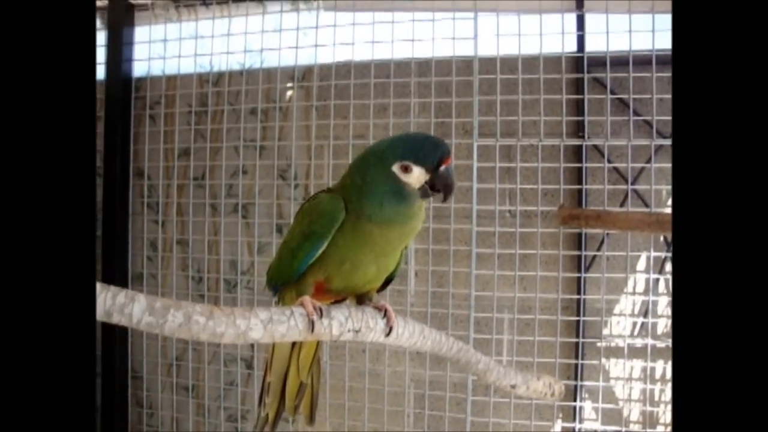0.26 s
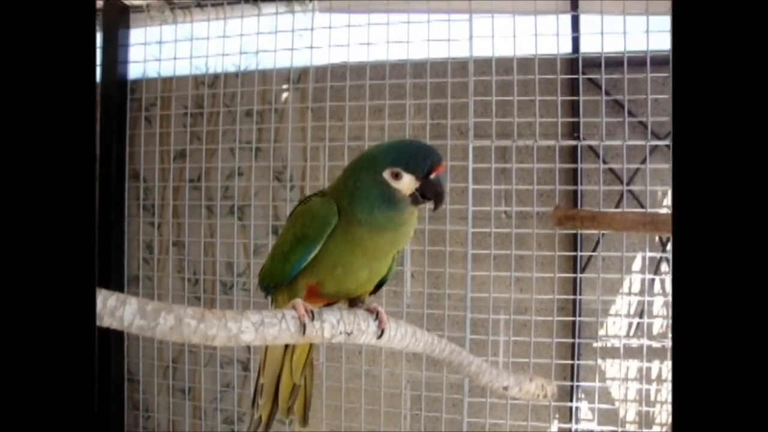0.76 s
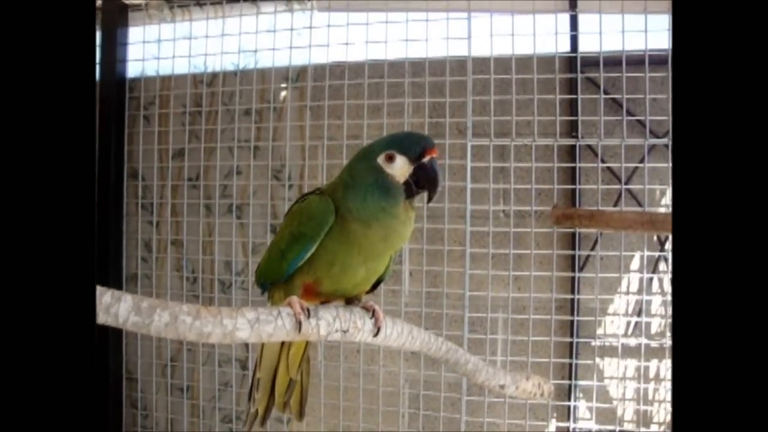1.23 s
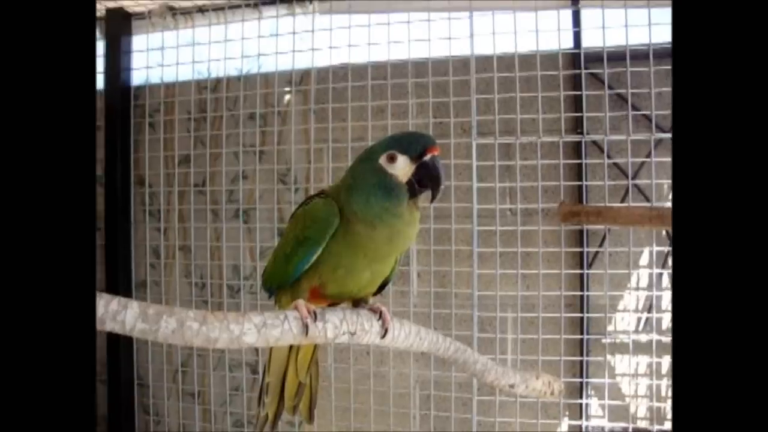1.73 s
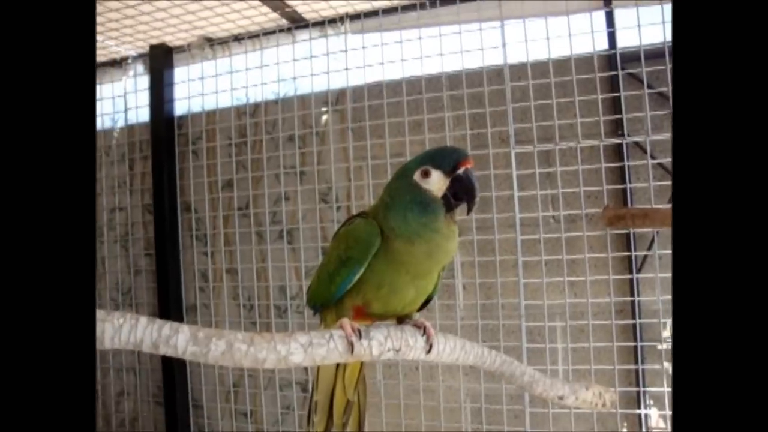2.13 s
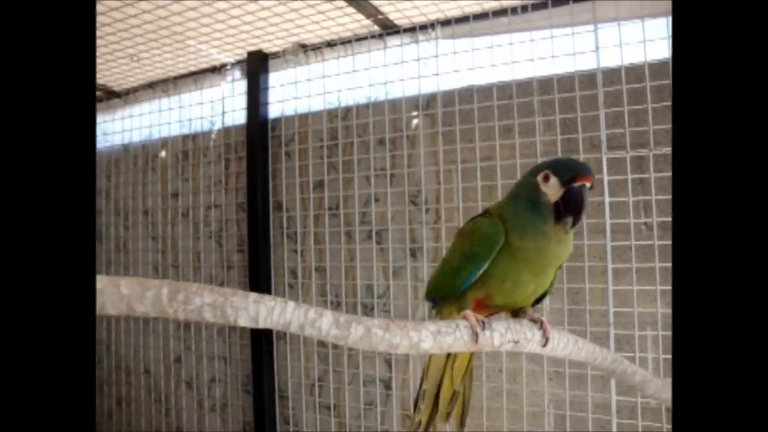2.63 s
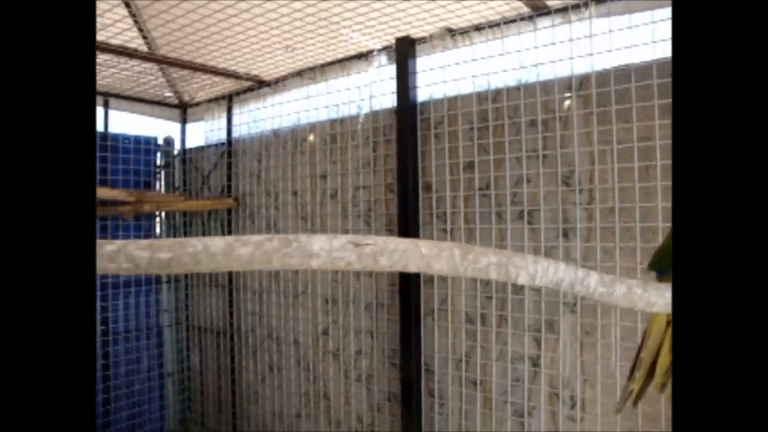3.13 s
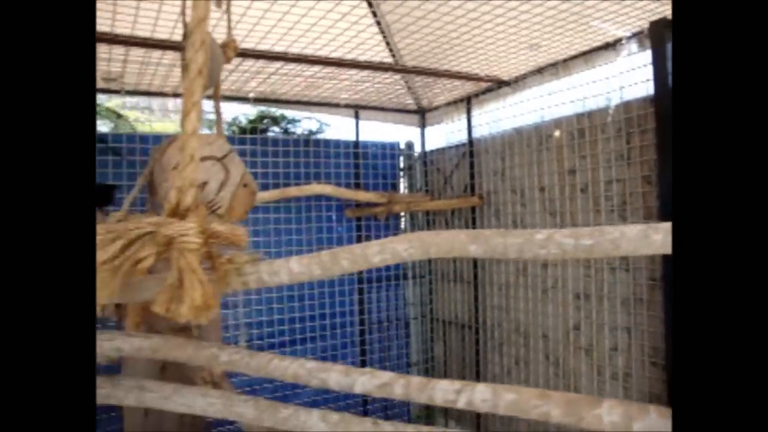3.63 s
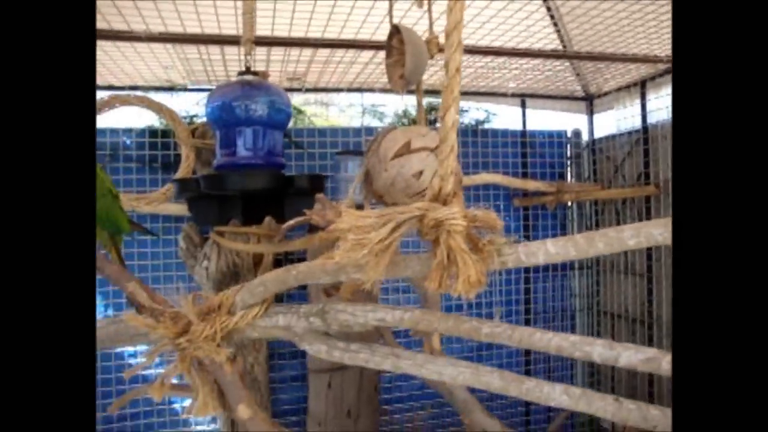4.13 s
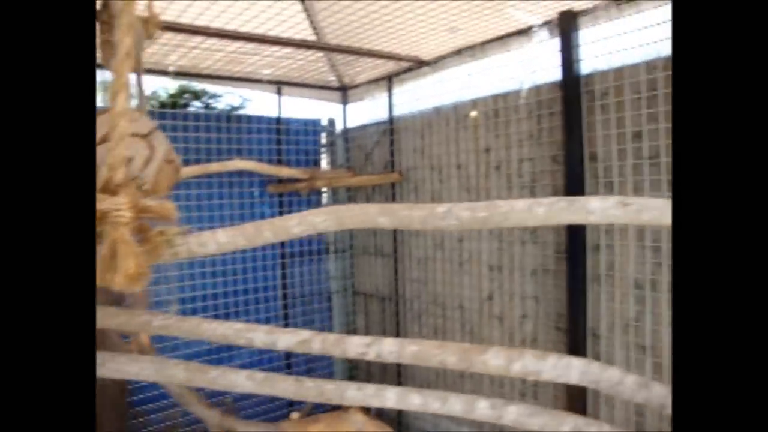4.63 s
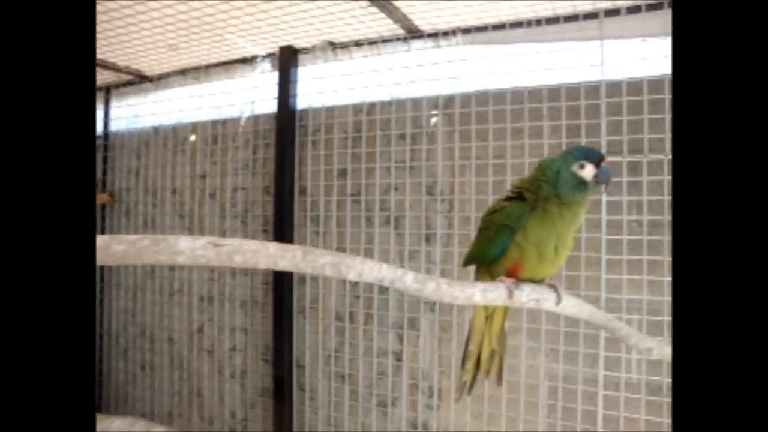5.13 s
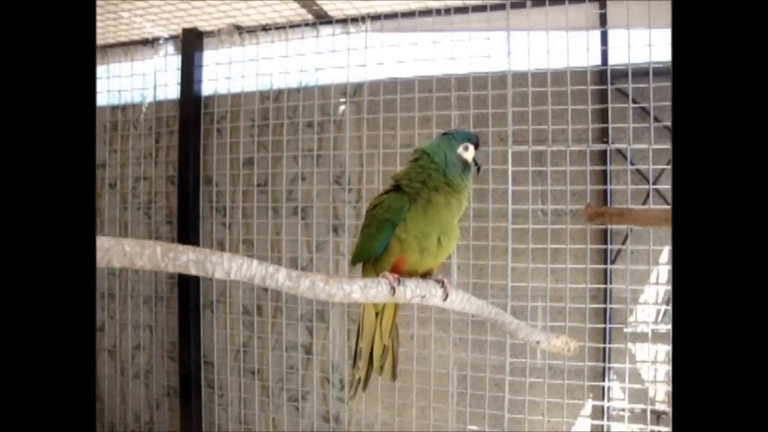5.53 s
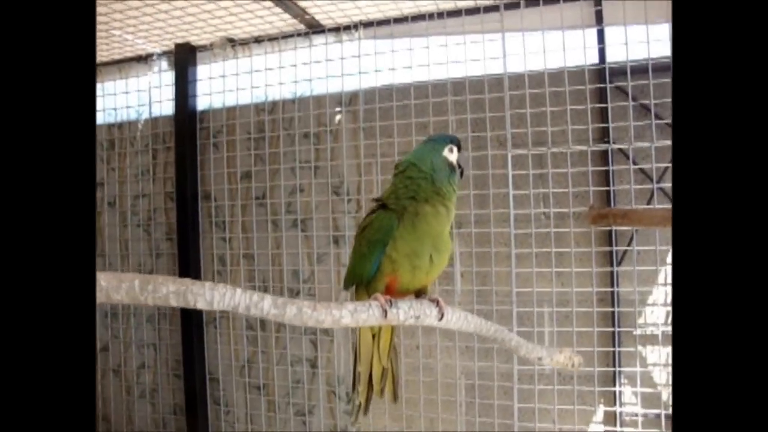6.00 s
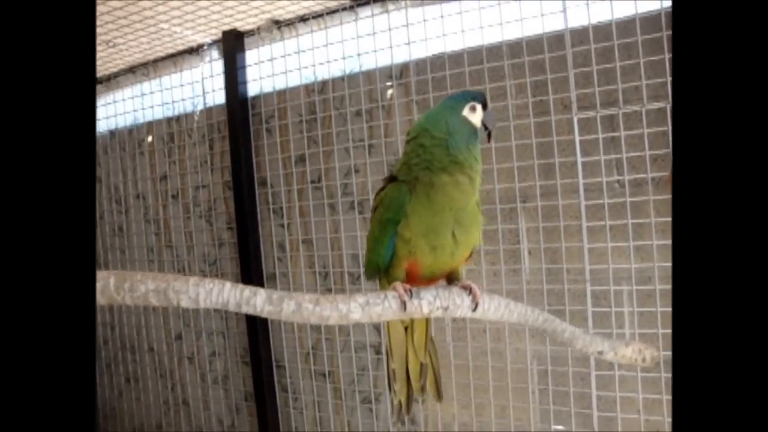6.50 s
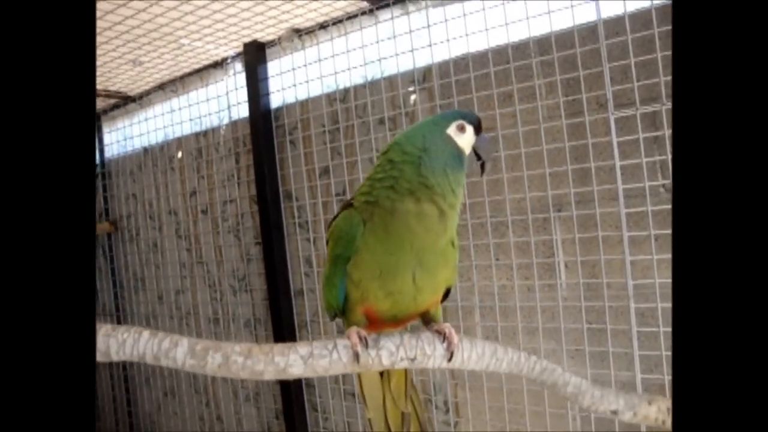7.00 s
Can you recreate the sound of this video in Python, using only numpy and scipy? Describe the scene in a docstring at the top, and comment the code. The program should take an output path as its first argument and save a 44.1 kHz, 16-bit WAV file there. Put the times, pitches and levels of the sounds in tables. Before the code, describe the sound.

In an outdoor aviary, a macaw close to the microphone briefly shakes its feathers and lets out a loud, harsh screech. About two seconds later it gives a lower squawk, a bark running into a rasp. Both calls echo briefly and slightly overload the microphone. Near the end come a few small clicks of beak or claw. Faint distant birds and a steady hiss continue throughout.

```python
"""Over a steady outdoor murmur and hiss, distant birds call and whistle from first to last.
Near 2 s a macaw in a wire aviary shakes its feathers and screeches; near 4 s comes a lower squawk,
a bark running into a rasp. Each syllable is a rough, arching pulse train from the syrinx, filtered by
throat and beak and reflected by walls and roof. The loud calls overload the microphone and make the
recorder turn down its bass for a moment. Near 7 s a beak or claw makes three small clicks."""
import sys
import numpy as np
from scipy import signal
from scipy.fft import rfft, irfft, next_fast_len
from scipy.io import wavfile
from scipy.ndimage import uniform_filter1d, map_coordinates

SR = 44100
rng = np.random.default_rng(int(sys.argv[2]) if len(sys.argv) > 2 else 0)


def output_pcm(signal):
    """Save a mono or channel-first signal as 16-bit PCM at the path in sys.argv[1].

    Samples are clipped to [-1, 1] before scaling.
    """
    pcm = np.clip(np.atleast_2d(signal).T, -1, 1) * 32767
    wavfile.write(sys.argv[1], SR, np.round(pcm).astype(np.int16))


N = 319989
T = np.arange(N) / SR
TOP_HZ = 10080  # band limit

# spectra of the outdoor background: (frequency [Hz], relative level [dB])
RUMBLE_SPECTRUM = [(20, -29.5), (50, -18), (100, -6.5), (140, 0), (200, -3.5), (330, -3), (480, -5.5),
                   (900, -57)]
MURMUR_SPECTRUM = [(200, -15.5), (400, -4.5), (600, -0.5), (850, -0.5), (1200, -6), (1700, -14.5),
                   (2500, -20.5), (5000, -47.5)]
HISS_SPECTRUM = [(500, -27), (1500, -3.5), (3000, 1), (4500, 0), (7000, -1.5), (10000, -4)]
# distant harsh calls: (time [s], source level [dB], centre frequency [Hz], fall [octaves/s])
FAR_CALLS = [(0.119, -49.5, 3420, 1.8), (0.245, -60, 3200, 0.37), (.89, -58.5, 3270, .8),
             (1.582, -53.5, 3250, 0.47), (2.779, -55, 3390, .3), (3.498, -59, 3170, 0.48),
             (4.444, -57, 3150, .7), (6.579, -52.5, 3440, 0.51)]
# distant whistles: (time [s], source level [dB], half width [s], pitch [Hz])
FAR_WHISTLES = [(.916, -63.5, 0.061, 2740), (1.799, -62, 0.1096, 3085), (4.52, -63.5, 0.1, 3070),
                (5.876, -52.5, 0.057, 1405), (6.57, -58, .03, 3910)]
# reverberation of the yard and of the aviary walls: (frequency [Hz], time to fall 60 dB [s])
YARD_DECAY = [(300, 0.35), (1000, 0.39), (2450, 0.48), (4200, 0.47), (9000, 0.28)]
WALL_DECAY = [(300, 0.057), (2000, 0.14), (9000, 0.18)]
# spectrum of rubbing feathers: (frequency [Hz], relative level [dB])
FEATHER_SPECTRUM = [(120, -48), (200, -35), (321, 6.5), (532, -18), (627, 8), (714, 0), (1870, 1.5),
                    (9880, -6), (12800, -51)]
# pitch arch of each syllable, from start to end: (time [s], pitch [Hz])
SCREECH_PITCH = [(2.151, 539.5), (2.2, 528.4), (2.248, 790.7), (2.279, 917.7), (2.338, 925.7),
                 (2.368, 1189), (2.398, 807), (2.416, 658), (2.445, 536)]
BARK_PITCH = [(3.822, 595.8), (3.841, 609.2), (3.853, 912), (3.870, 939.3), (3.886, 643.2), (3.905, 686),
              (3.918, 649), (3.942, 434)]
RASP_PITCH = [(3.940, 434), (3.982, 584.3), (4.004, 625.3), (4.038, 761), (4.078, 610.7), (4.098, 451),
              (4.126, 286)]
# screech, bark, rasp: (source level [dB], attack [s], release [s], open-beak treble [dB],
# beak opening [s], beak closing [s], clearest moment [s], its half width [s], its roughness [0-1])
GESTURES = [(-11.5, 0.062, 0.033, -1.5, 0.17, 0.049, 2.33, 0.0339, 0.18),
            (-11, 0.083, 0.041, 3, 0.084, .003, 3.83, 0.024, 0.27),
            (-21, 0.022, 0.048, 2, .003, 0.083, 4.03, .022, 0.36)]
# response of throat and open beak: (frequency [Hz], relative gain [dB])
SCREECH_THROAT = [(300, -50), (520, -20.5), (800, -14), (1150, -12), (1400, -16), (1850, -3.5), (2100, -1),
                  (2400, 2.5), (2800, -6.5), (3900, -14), (4600, -15.5), (5800, -23), (7250, -18),
                  (8400, -36.5), (10000, -40)]
BARK_THROAT = [(250, -47.5), (450, -10.5), (640, -8), (800, -13.5), (940, -4), (1120, -10), (1400, -0.5),
               (1650, -7.5), (2000, 0), (2350, -11.5), (2750, -3.5), (3400, -20), (3950, -15), (4170, -8),
               (4450, -16), (4800, -15), (5600, -22), (8500, -31), (10000, -40)]
RASP_THROAT = [(200, -34), (320, -12.5), (450, -16), (620, -6), (760, -10.5), (900, -2.5), (1150, -4),
               (1430, 0.5), (1620, -3.5), (1850, -5.5), (2500, -12.5), (3000, -23.5), (3950, -18),
               (4200, -9), (4450, -23.5), (4750, -14.5), (5600, -28), (7000, -32.5), (10000, -41)]
# bright and broad parts of the air noise in the syrinx: (frequency [Hz], gain [dB])
FIZZ_SPECTRUM = [(1500, -20.5), (3000, 1.0), (4500, 2), (7000, 5)]
BREATH_SPECTRUM = [(400, -11), (1200, 1.5)]
# the syrinx catches as a call starts and between pushes: (time [s], depth [dB], half width [s])
CATCHES = [(2.168, 19, 0.0026), (2.186, 11, 0.0028), (2.208, 12, 0.0063), (2.232, 3.5, .009),
           (2.285, 5, 0.011), (2.369, 3, 0.0088), (3.844, 7.5, 0.0064), (3.887, 7, 0.0057)]
# clicks of beak or claw: (time [s], crack level [dB], ring level [dB])
CLICKS = [(6.708, -43, -27), (7.094, -44.5, -60), (7.122, -46, -60)]
# modes of a click's ring: (frequency [Hz], relative level [dB], time to fall 60 dB [s])
CLICK_MODES = [(1920, 2.5, 0.018), (2030, -17, 0.018)]
# spectrum of a click's crack: (frequency [Hz], relative level [dB])
CRACK_SPECTRUM = [(600, -19), (1500, 2.5), (3000, 3), (4700, -5), (9000, -17)]


def amp(db):
    """Amplitude ratio: tenfold for every 20 dB."""
    return 10 ** (np.asarray(db) / 20)


def unit_rms(x):
    """Normalisation to unit mean power."""
    return x / np.sqrt(np.mean(x ** 2) + 1e-20)


def along(points, hz):
    """Interpolation of (frequency, value) points on a logarithmic frequency axis."""
    frequencies, values = np.transpose(points)
    return np.interp(np.log(hz + 1), np.log(frequencies + 1), values)


def wobble(rate, t):
    """Low-pass random modulation: a spline through `rate` Gaussian knots a second."""
    knots = rng.standard_normal(2 ** 13)
    return map_coordinates(knots, [(t - t[0]) * rate], mode="wrap")


def filtered(x, response):
    """Linear filtering: the spectrum is multiplied by a frequency response."""
    size = next_fast_len(len(x) + 2 ** 13)
    return irfft(rfft(x, size) * response(np.fft.rfftfreq(size, 1 / SR)), size)[:len(x)]


def coloured(x, spectrum):
    """Zero-phase spectral shaping by (frequency [Hz], gain [dB]) points."""
    return filtered(x, lambda hz: amp(along(spectrum, hz)))


def noise(spectrum):
    """Spectrally shaped Gaussian noise of unit power."""
    return unit_rms(coloured(rng.standard_normal(N), spectrum))


def swell(centre, half_width, t=T):
    """Gaussian envelope whose standard deviation is half_width."""
    return np.exp(-.5 * np.minimum(((t - centre) / half_width) ** 2, 100))


def ramps(t, first_s, last_s):
    """Linear edge ramps: 1 at both ends of t, 0 in the hold between."""
    return np.clip(np.maximum(1 - (t - t[0]) / first_s, 1 - (t[-1] - t) / last_s), 0, 1)


def outdoors():
    """Incoherent addition: a drifting far rumble and murmur under an even hiss."""
    rumble = amp(-57.5 + 1.3 * wobble(6.5, T)) * noise(RUMBLE_SPECTRUM)
    murmur = amp(-50 + 0.4 * wobble(9, T)) * noise(MURMUR_SPECTRUM)
    return rumble + murmur + amp(-56.5) * noise(HISS_SPECTRUM)


def far_calls():
    """Narrow-band noise: each distant harsh call is blurred to one falling resonance."""
    out = np.zeros(N)
    for time, db, centre_hz, fall in FAR_CALLS:
        inside = np.abs(T - time) < .3
        t = T[inside]
        phase = 2 * np.pi * np.cumsum(centre_hz * 2 ** (-fall * (t - time))) / SR
        band = wobble(1100, t) * np.cos(phase) + wobble(1100, t) * np.sin(phase)
        out[inside] += amp(db) * swell(time, half_width=0.046, t=t) * band
    return out


def reverberation(x, decay, delay_s):
    """Diffuse reflection: convolution with noise that decays exponentially, each band at its own rate."""
    hz, t, bands = signal.stft(rng.standard_normal(SR * 3 // 4), SR, nperseg=256)
    tail = signal.istft(bands * amp(-60 * t / along(decay, hz)[:, None]), SR, nperseg=256)[1]
    tail = filtered(tail, lambda f: f < TOP_HZ)
    tail *= np.sqrt(2 * TOP_HZ / SR) / np.linalg.norm(tail)  # unit mean power gain in the band
    return signal.fftconvolve(x, np.pad(tail, (int(delay_s * SR), 0)))[:N]


def far_whistles():
    """Frequency modulation: distant birds whistle pure tones that waver slightly."""
    waver = 1 + 0.0064 * wobble(90, T)
    phase_per_hz = 2 * np.pi * np.cumsum(waver) / SR
    return sum(amp(db) * swell(time, half_width) * np.sqrt(2) * np.sin(hz * phase_per_hz)
               for time, db, half_width, hz in FAR_WHISTLES)


def feathers(start_s=1.895, length_s=0.24, fade_s=0.061, beat_hz=22.2, swing_db=4.5):
    """Amplitude-modulated friction noise: each beat of the shaken plumage is a puff of tiny scrapes."""
    inside = (T > start_s) & (T < start_s + length_s)
    t = T[inside]
    beats_db = swing_db * np.sin(2 * np.pi * beat_hz * (t - t[0]))
    envelope = np.zeros(N)
    envelope[inside] = amp(-43.5 + beats_db - 12.7 * ramps(t, fade_s, fade_s))
    return envelope * noise(FEATHER_SPECTRUM) * amp(2.8 * wobble(600, T))


def articulation(t, gesture, harshness=0.726, edge_db=25, beak_shut_db=12.5):
    """Vocal modulation: the level rises and falls, roughness clears once, the beak opens and closes."""
    peak_db, attack, release, open_db, opening, closing, clear_s, clear_width, clear_rough = gesture
    level_db = peak_db - edge_db * ramps(t, attack, release) ** 1.2
    roughness = harshness + (clear_rough - harshness) * swell(clear_s, clear_width, t)
    treble_db = open_db - beak_shut_db * ramps(t, opening, closing)
    return level_db, roughness, treble_db


def resonate(x, spectrum, size=2048):
    """Cavity resonance: a minimum-phase filter with this spectrum rings after each pulse."""
    gain = amp(along(spectrum, np.fft.rfftfreq(size, 1 / SR)))
    cepstrum = irfft(np.log(gain))
    cepstrum[1:size // 2] *= 2  # folding onto positive time makes the response causal
    cepstrum[size // 2 + 1:] = 0
    impulse_response = irfft(np.exp(rfft(cepstrum)))
    return signal.fftconvolve(x, impulse_response)[:len(x)]


def syllable(arch, gesture, throat, beak_hz, jitter, smear_rad, breath_db, fizz_db, flutter_db,
             fundamental_db, octave_db, doubling=0.42):
    """Source-filter principle: uneven syrinx pulses and air noise excite the throat and beak."""
    inside = (T > arch[0][0]) & (T < arch[-1][0])
    t = T[inside]
    pitch = np.interp(t, *np.transpose(arch))
    level_db, roughness, treble_db = articulation(t, gesture)
    # the membranes change their period every few cycles, which smears the overtones most
    pitch *= 1 + jitter * roughness * wobble(300, t)
    phase = 2 * np.pi * np.cumsum(pitch) / SR + smear_rad * roughness * wobble(600, t)
    harmonic = np.arange(1, 15)[:, None]
    boost_db = fundamental_db * (harmonic == 1) + octave_db * (harmonic == 2)
    strength = amp(boost_db) / np.sqrt(1 + (harmonic / 6) ** 4)
    alternation = 1 + doubling * roughness * np.cos(phase / 2)  # strong and weak cycles take turns
    pulses = unit_rms(alternation * np.sum(strength * np.cos(harmonic * phase), axis=0))
    # air bursts through once a cycle and takes over from the high overtones
    air = unit_rms(rng.standard_normal(N)[inside] * (1 + np.cos(phase)))
    fizz = amp(fizz_db) * coloured(air, FIZZ_SPECTRUM)
    breath = amp(breath_db) * roughness * coloured(air, BREATH_SPECTRUM)
    flutter = amp(flutter_db * roughness * wobble(450, t))
    voice = resonate((pulses + breath + fizz) * flutter, throat)
    # a wider beak lets out more of the treble, which also flickers
    treble = filtered(voice, lambda hz: 1 - 1 / (1 + (hz / beak_hz) ** 6))
    voice += (amp(treble_db + 4.9 * wobble(107, t)) - 1) * treble
    voice /= np.sqrt(np.abs(uniform_filter1d(voice ** 2, size=300)) + 1e-12)  # unit running rms
    out = np.zeros(N)
    out[inside] = voice * amp(level_db) * (1 - ramps(t, .002, .002))
    return out


def macaw():
    """Interrupted phonation: a stuttering start into the screech, later a bark that runs into a rasp."""
    screech = syllable(SCREECH_PITCH, GESTURES[0], SCREECH_THROAT, beak_hz=3680,
                       jitter=0.0594, smear_rad=0.4, breath_db=0, fizz_db=-3,
                       flutter_db=2.5, fundamental_db=2.5, octave_db=1.5)
    bark = syllable(BARK_PITCH, GESTURES[1], BARK_THROAT, beak_hz=2390,
                    jitter=0.058, smear_rad=0.36, breath_db=-2, fizz_db=-0.5,
                    flutter_db=4.0, fundamental_db=5.5, octave_db=1.0)
    rasp = syllable(RASP_PITCH, GESTURES[2], RASP_THROAT, beak_hz=3000,
                    jitter=0.0664, smear_rad=0.42, breath_db=-0.5, fizz_db=-0.5,
                    flutter_db=3.5, fundamental_db=2.5, octave_db=0)
    catches_db = sum(depth_db * swell(time, half_width) for time, depth_db, half_width in CATCHES)
    return (screech + bark + rasp) * amp(-catches_db)


def bass_cut(x, threshold_db=-21.5, corner_hz=670, recovery_db_per_s=5.5):
    """Automatic gain control: a loud sound turns the recorder's bass down at once, and it creeps back."""
    level_db = 10 * np.log10(np.abs(uniform_filter1d(x ** 2, size=2200)) + 1e-12)
    excess_db = np.maximum(level_db - threshold_db, 0)
    recovery_db = recovery_db_per_s * T
    cut_db = np.maximum.accumulate(excess_db + recovery_db) - recovery_db
    bass = filtered(x, lambda hz: 1 / (1 + (hz / corner_hz) ** 2))
    return x + (amp(-cut_db) - 1) * bass


def overload(x, positive_limit=0.52, negative_limit=0.74):
    """Asymmetric saturation: the microphone rounds off peaks, one side sooner, making soft thumps."""
    headroom = np.where(x > 0, positive_limit, negative_limit)
    return x / (1 + np.abs(x / headroom) ** 6) ** (1 / 6)


def clicks(ring_rise_s=0.0012, crack_t60_s=0.035):
    """Impact excitation: a beak or claw makes a short crack and a hollow ring of damped modes."""
    out, crack = np.zeros(N), noise(CRACK_SPECTRUM)
    t = np.arange(SR // 10) / SR
    for time, crack_db, ring_db in CLICKS:
        ring = sum(amp(db - 60 * t / t60) * np.sin(2 * np.pi * hz * t) for hz, db, t60 in CLICK_MODES)
        span = slice(round(time * SR), round(time * SR) + len(t))
        out[span] += amp(ring_db) * ring * (1 - np.exp(-t / ring_rise_s))
        out[span] += amp(crack_db - 60 * t / crack_t60_s) * crack[span]
    return out


def scene():
    """Superposition of direct and reflected sound: the walls answer the macaw, the yard every bird."""
    near = macaw() + feathers()
    far = far_calls() + far_whistles()
    walls = amp(-6) * reverberation(near, WALL_DECAY, delay_s=.004)
    yard = reverberation(amp(-14.5) * near + amp(-6.5) * far, YARD_DECAY, delay_s=0.016)
    return (near + walls + yard + amp(-1.5) * far + clicks() + outdoors())[None]


def record(dry):
    """Stages in cascade: bass cut, overload, then a pass band from 40 Hz to TOP_HZ."""
    x = overload(bass_cut(dry[0]))
    return filtered(x, lambda hz: (hz < TOP_HZ) * hz / np.hypot(hz, 40))[None]


dry = scene()
out = record(dry)
output_pcm(out)
```